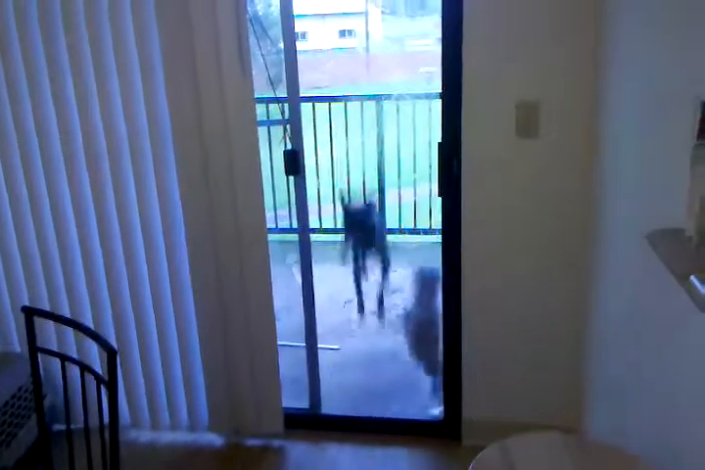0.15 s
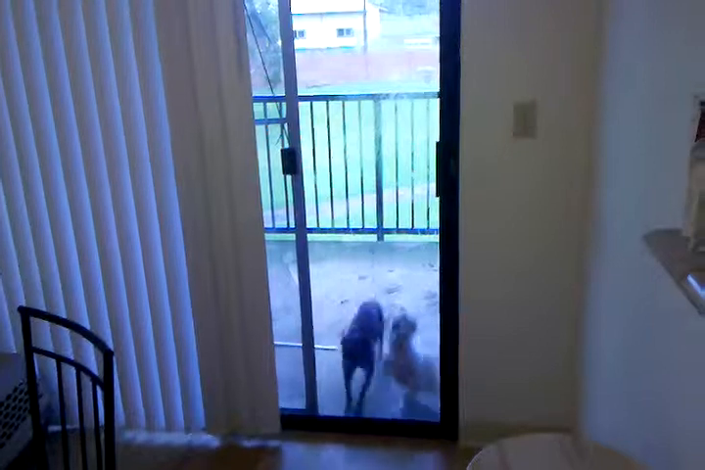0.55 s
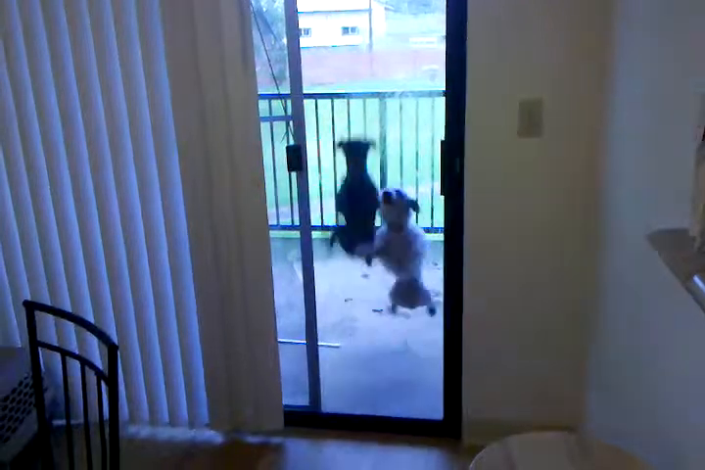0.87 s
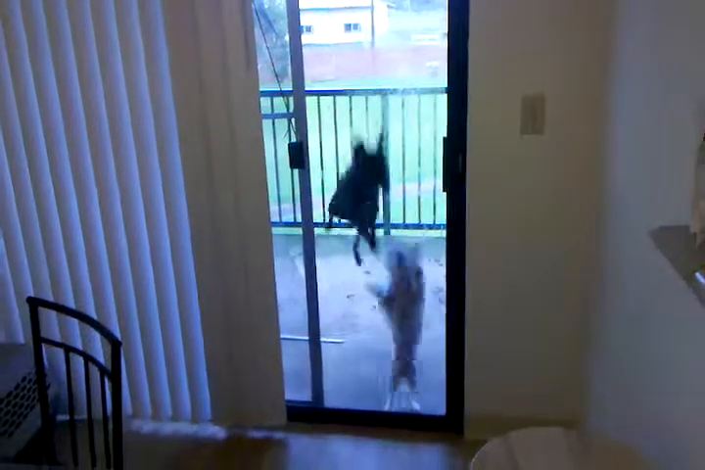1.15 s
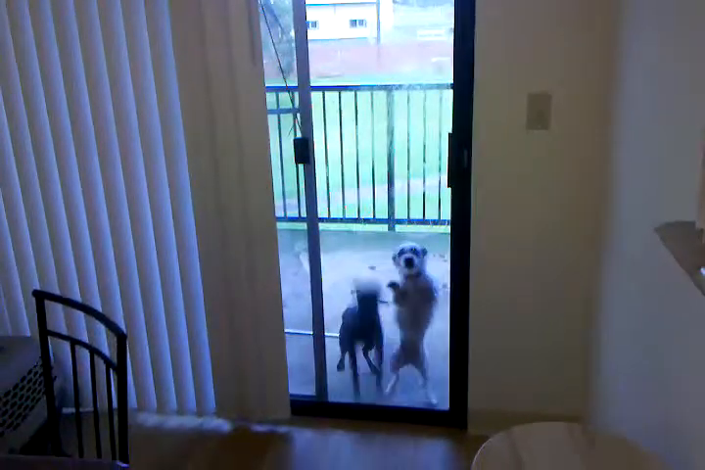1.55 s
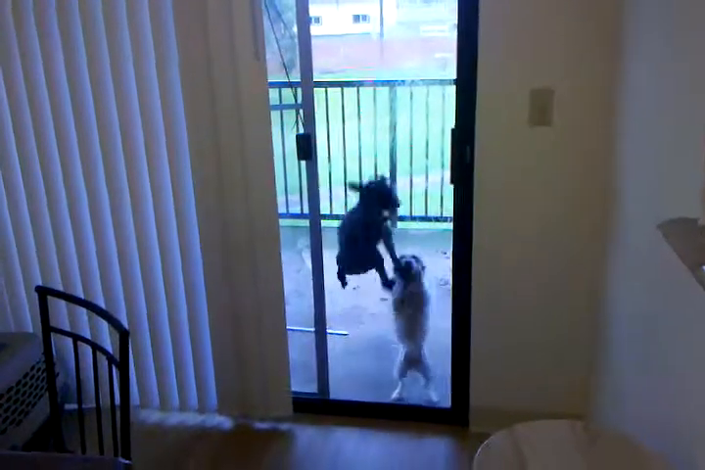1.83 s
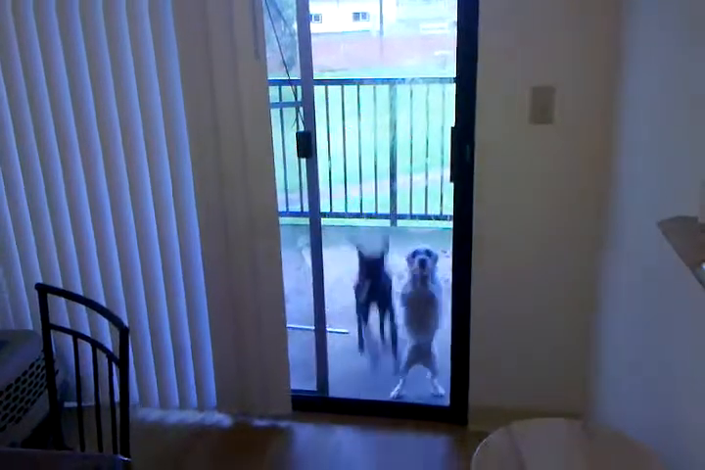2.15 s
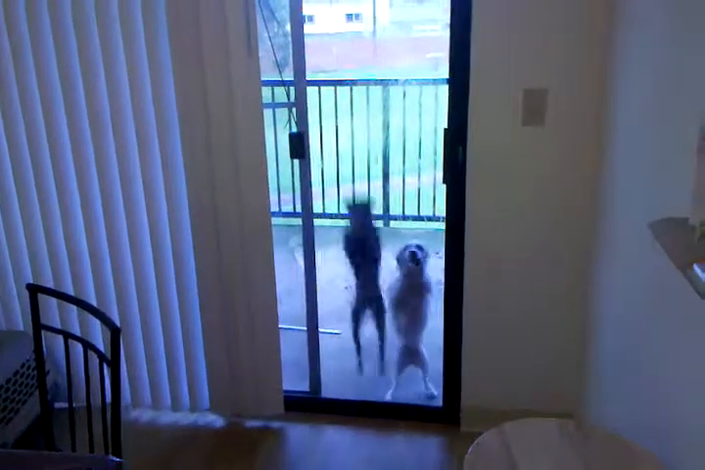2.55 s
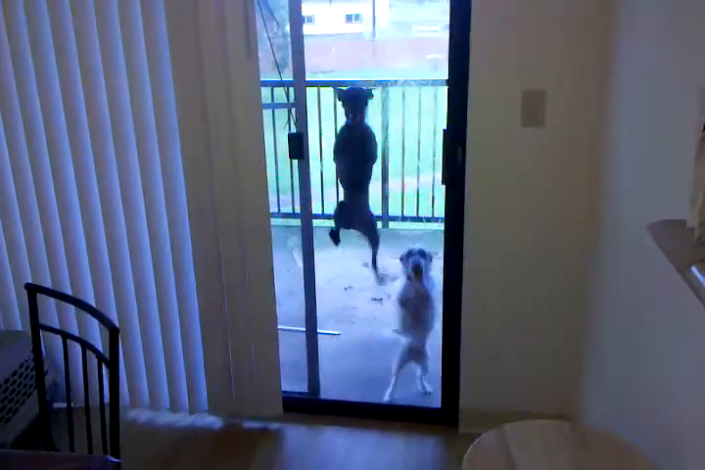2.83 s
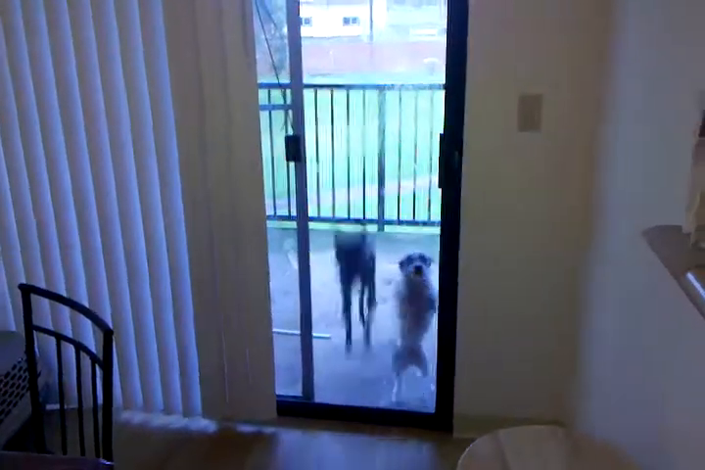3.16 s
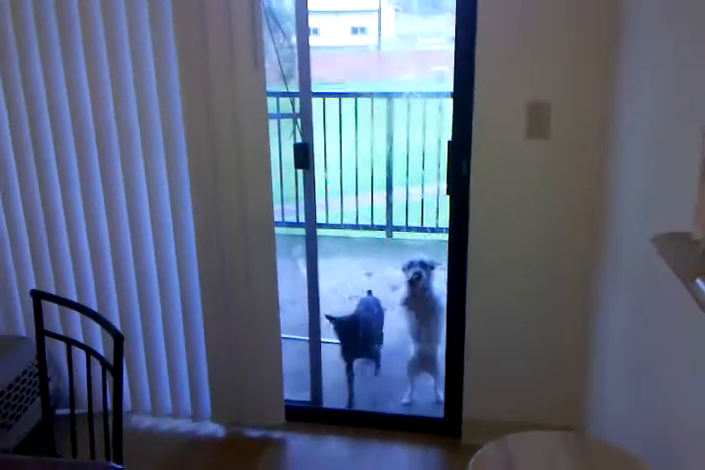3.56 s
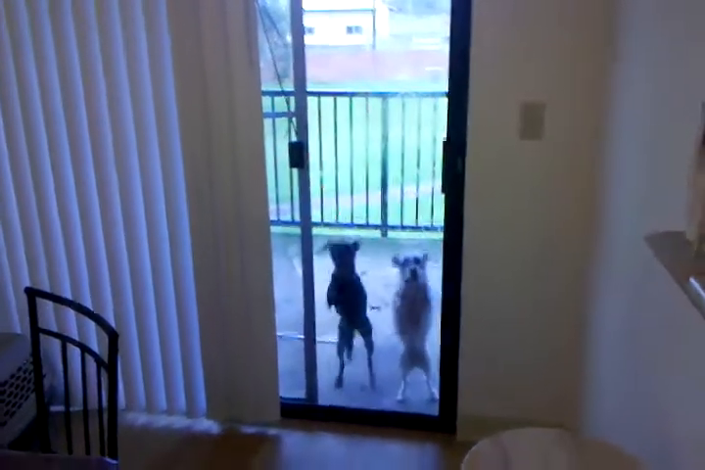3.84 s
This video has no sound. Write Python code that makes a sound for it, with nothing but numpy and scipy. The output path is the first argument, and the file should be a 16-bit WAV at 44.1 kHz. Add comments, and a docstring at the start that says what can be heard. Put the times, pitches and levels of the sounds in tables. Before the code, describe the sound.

Dog claws strike and skitter on a sliding glass door from 0 s, in irregular bright bursts, strongest around 0, 1.1-1.2, 2.0 and 2.9 s. Soft low paw booms and door-track rattles accompany them. Very short, wavering whines appear from 0.25 s, with raspy yelps near 0.4, 2.4 and 3.8 s. Dry double knocks sound close at 3.3 and 3.6 s. Bare reverberant room, faint air and low hum.

```python
"""Two dogs leap at a sliding glass door for four seconds, heard from inside a bare, echoing room. From the
first instant claws chatter on the pane (noisy blows through ringing glass) and paws make it boom; the door soon
clatters in its track. From 0.25 s come whines (wavering gliding tones), from 0.4 s rasping yelps (filtered
noise). Near 3.3 s and 3.6 s two dry double clicks (damped sines with noise ticks) sound right at the
microphone. Room air (shaped noise) and a soft, steady hum (a sine) lie underneath throughout."""
import sys
import numpy as np
from scipy import signal
from scipy.fft import rfft, irfft
from scipy.io import wavfile
from scipy.ndimage import uniform_filter1d

SR = 44100
rng = np.random.default_rng(int(sys.argv[2]) if len(sys.argv) > 2 else 0)


def wav_record(signal):
    """Record a signal, one row per channel, as 16-bit PCM in the file named by sys.argv[1]."""
    frames = np.transpose(np.atleast_2d(signal))
    bounded = np.clip(frames, -1, 1)
    # unit amplitude maps onto the largest positive 16-bit level
    quanta = np.round(bounded * 32767).astype(np.int16)
    wavfile.write(sys.argv[1], SR, quanta)


N = 176400
T = np.arange(N) / SR

# All event levels are those of the direct sound, before room and microphone.
# Claws on the glass: (time [s], level [dB], scrape length [s], emphasised frequency [Hz])
CLAW_SCRAPES = [(0.0, -21, 0.004, 5000), (0.022, -42, 0.023, 4500), (0.117, -33, 0.0055, 5900),
                (.232, -68, 0.0063, 4860), (0.435, -37, 0.025, 4600), (0.601, -44.5, 0.0067, 5900),
                (0.64, -28, 0.0077, 4900), (.852, -48, 0.012, 4400), (1.054, -37.5, .008, 4630),
                (1.06, -26.5, 0.012, 5600), (1.125, -25.5, .012, 4300), (1.15, -33, 0.0089, 4200),
                (1.218, -24, 0.01, 3830), (1.261, -40.5, 0.023, 4440), (1.386, -38.5, 0.024, 4340),
                (1.492, -35, .016, 5060), (1.526, -37.5, 0.021, 5170), (1.648, -44.5, 0.013, 4160),
                (1.708, -42, 0.013, 5200), (1.734, -44, 0.0072, 3940), (1.924, -50, 0.014, 5500),
                (1.962, -23, 0.008, 5800), (2.005, -25.5, 0.006, 4180), (2.041, -29, 0.0058, 6040),
                (2.074, -36.5, .012, 5160), (2.114, -37.5, 0.0075, 5400), (2.175, -31, 0.013, 4300),
                (2.203, -36.5, 0.021, 5000), (2.429, -37, 0.01, 4630), (2.589, -43.5, 0.018, 4930),
                (2.656, -48.5, 0.0088, 5000), (2.802, -36, 0.0047, 5100), (2.871, -36.5, 0.0088, 4600),
                (2.902, -21.5, 0.004, 5250), (2.936, -38, 0.0044, 3940), (2.960, -25, 0.0047, 6400),
                (3.023, -34, 0.0091, 4640), (3.048, -36.5, 0.02, 5550), (3.196, -34.5, 0.015, 3970),
                (3.244, -39.5, 0.02, 4200), (3.294, -36.5, 0.0073, 5400), (3.358, -41.5, 0.0096, 5000),
                (3.421, -39, 0.013, 4770), (3.495, -40.5, 0.0052, 5450), (3.531, -37, 0.016, 5670),
                (3.581, -43, 0.021, 4150), (3.638, -47, 0.025, 5070), (3.708, -41, 0.017, 5300),
                (3.723, -39, 0.016, 5360), (3.837, -32.5, 0.0034, 5230), (3.853, -32.5, 0.008, 5060),
                (3.889, -41.5, 0.018, 5570), (3.915, -41, .04, 4850)]
# Door shaken in its track: (time [s], level [dB], rattle length [s])
DOOR_RATTLES = [(0.085, -49.5, 0.08), (.225, -43.5, 0.0079), (0.438, -53, 0.049), (0.652, -42.5, 0.021),
                (0.696, -53, 0.026), (.756, -39, 0.0084), (1.14, -52.5, 0.073), (1.217, -34.5, 0.013),
                (1.272, -43, 0.026), (1.528, -54.5, 0.049), (1.685, -53, 0.06), (1.76, -47, 0.042),
                (1.792, -56, 0.03), (1.85, -46.5, 0.0095), (1.955, -48, 0.031), (2.069, -59.5, 0.024),
                (2.292, -47.5, 0.032), (2.33, -42.5, 0.02), (2.429, -52, 0.013), (2.87, -43, 0.025),
                (3.023, -37.5, 0.009), (3.39, -42, 0.032), (3.529, -42.5, 0.026), (3.582, -41, 0.0064),
                (3.706, -64, 0.021), (3.835, -45.5, 0.01), (3.895, -39, .015), (3.918, -41, 0.027),
                (3.972, -49, .03)]
# Weight of a dog on the pane: (time [s], level [dB], push length [s], emphasised frequency [Hz])
PANE_BOOMS = [(0.0, -43.5, 0.029, 152), (.08, -43.5, 0.022, 136), (0.449, -50.5, 0.022, 164),
              (0.689, -49, 0.016, 194), (1.138, -49, .065, 116), (1.258, -68, 0.019, 78.5),
              (1.774, -52, 0.039, 200), (2.066, -42, 0.0083, 138), (2.221, -53.5, 0.05, 88),
              (2.36, -52.5, 0.081, 130), (2.46, -57, 0.059, 80), (2.586, -49.5, 0.012, 92),
              (2.724, -53, 0.058, 175), (2.879, -57.5, 0.079, 150), (3.021, -59, 0.033, 125),
              (3.28, -47.5, 0.029, 149), (3.40, -54, 0.032, 111), (3.569, -60.5, 0.038, 176),
              (3.70, -54, 0.12, 116.6), (3.897, -44.5, 0.031, 176.5), (3.972, -54, 0.038, 170)]
# Whines: (time [s], length [s], first pitch [Hz], last pitch [Hz], level [dB],
#          octave overtone relative to the fundamental [dB])
DOG_WHINES = [(0.249, 0.052, 1114, 1073, -57, -42), (.376, 0.041, 1151, 1356, -46.5, -13),
              (0.39, 0.05, 1318, 1792, -48, 4), (1.332, 0.039, 1137, 1186, -45, -24),
              (1.39, 0.028, 1055, 1118, -50, -47), (1.565, 0.11, 772, 841, -53.5, -36),
              (1.783, 0.062, 1956, 1990, -48, -33), (1.793, 0.058, 2070, 2420, -49, -39.5),
              (1.865, 0.042, 2443, 2437, -53, -33.5), (2.299, 0.043, 1800, 1797, -42.5, -9),
              (2.39, 0.074, 1244, 1064, -52, -11.5), (2.772, 0.039, 1846, 1983, -44.5, -36),
              (2.785, 0.015, 1340, 1195, -49.5, -27), (2.795, .04, 2196, 2345, -51.5, -28),
              (2.86, 0.06, 1268, 1158, -46.5, -5), (3.276, 0.023, 1325, 1323, -48, -43),
              (3.334, 0.015, 1353, 1329, -45.5, -32), (3.755, 0.044, 1550, 1584, -48, -27),
              (3.829, 0.042, 1431, 1579, -44, -23), (3.83, 0.031, 1027, 1043, -47, -35)]
# Hoarse yelps: (time [s], length [s], level [dB], throat resonance [Hz])
DOG_YELPS = [(.425, 0.04, -44, 1060), (.435, 0.041, -47.5, 1650), (2.41, 0.08, -55, 2290),
             (3.826, 0.031, -44.5, 1330)]
# Clicks right at the microphone: (time [s], peak of the ring [dB], pitch [Hz], tick gain relative to it [dB])
CLOSE_CLICKS = [(3.3183, -35.5, 1200, 10.5), (3.3389, -26.5, 690, -3), (3.586, -35, 520, -12),
                (3.6059, -24.5, 520, -4.5)]

# Spectra of the struck bodies and of the room air: (frequency [Hz], relative level [dB])
CLAW_SPECTRUM = [(150, -17.5), (500, -25), (1200, -18), (1950, -19.5), (2600, -11), (3200, -6.5), (4000, 1),
                 (5200, -1), (6700, -3.5), (7500, -0.5)]
DOOR_SPECTRUM = [(100, -35.5), (250, -1.5), (350, 5), (490, 3), (620, 3), (860, 5.5), (1100, 3.5),
                 (1450, 4.5), (1800, -6), (3000, -8.5), (7000, -43)]
PANE_SPECTRUM = [(35, -41.5), (58, -17.5), (78, -3.5), (98, -7), (120, -7), (145, -6.5), (175, -1),
                 (230, -9), (330, -4.5), (600, -16.5), (2000, -43.5)]
AIR_SPECTRUM = [(30, -27), (60, -22.5), (80, -10.5), (100, -8), (150, -5), (250, -5), (400, -8.5),
                (500, -8), (1000, -11), (2000, -15), (3000, -20), (4500, -11), (7000, -17.5)]
# Ringing modes of the glass and of its frame: (frequency [Hz], relative level [dB], 60 dB decay time [s])
GLASS_RING = [(3056, 8.5, 0.098), (3880, -5.5, 0.043), (4080, -40, 0.056), (4870, -8, .1),
              (5080, 24.5, 0.052), (6300, 18.5, 0.041), (7150, 30.5, 0.039)]
FRAME_RING = [(500, 7.5, 0.23), (894, -0.5, 0.096), (1166, -1, 0.062), (1370, -12, 0.047), (1450, -2, 0.08)]

CHATTER_PER_S, RATTLE_PER_S, PUSH_PER_S = 2000, 700, 1000  # mean rate of tiny blows
HOARSE_DB, HOARSE_WIDTH_HZ = -10, 280  # breath noise in a whine, relative to its tone
CLICK_RISE_S, CLICK_DECAY_S = 0.00091, 0.0022
ROOM_T60_S, ROOM_TREBLE_T60_S, ROOM_GAP_S = 0.7, 0.54, 0.0068
AIR_DB, HUM_DB, HUM_HZ = -53.5, -64, 118.6  # RMS levels before the microphone
TOP_HZ = 7050  # upper limit of the microphone


def amp(db):
    """Turn decibels into an amplitude factor."""
    return 10 ** (np.asarray(db) / 20)


def unit(x):
    """Scale to an energy of 1."""
    return x / np.sqrt(np.sum(x ** 2) + 1e-18)


def add(out, at, x):
    """Mix x in from a given time."""
    i = int(np.clip(at * SR, 0, N - 1))
    out[i:i + len(x)] += x[:N - i]


def through(x, response):
    """Convolve with an impulse response."""
    return signal.fftconvolve(x, response)[:N]


def colour(points, size=4096):
    """Minimum-phase impulse response with a given spectrum and unit energy, made by folding the cepstrum."""
    hz, db = np.array(points).T
    f = np.maximum(np.fft.rfftfreq(size, 1 / SR), 1)
    level_db = np.interp(np.log(f), np.log(hz), db)
    rolloff = np.log(1 + (f / hz[-1] / 1.1) ** 16)  # steep fall above the last point
    cepstrum = irfft(np.log(amp(level_db)) - rolloff)
    cepstrum[1:size // 2] *= 2
    cepstrum[size // 2 + 1:] = 0
    return unit(irfft(np.exp(rfft(cepstrum)))[:size // 2])


def band(x, hz, width_hz):
    """One resonance, gain 1 at its centre."""
    return signal.lfilter(*signal.iirpeak(hz, hz / width_hz, fs=SR), x)


def body(points, modes, ring_db):
    """A struck object: a broad crack and a few ringing modes."""
    crack = colour(points, size=16384)
    t = T[:len(crack)]
    ring = np.zeros(len(t))
    for hz, db, t60 in modes:
        ring += amp(db - 60 * t / t60) * np.cos(2 * np.pi * hz * t)
    return unit(crack + amp(ring_db) * unit(ring))


def contact(length, rate, rise_s, release_s, spread_db, size=8192):
    """Stick and slip: irregular tiny blows that set in, hold and die away."""
    t = T[:size]
    chance, strength = rng.random(size), rng.standard_normal(size)
    sign = rng.choice([-1, 1], size)
    onset = 1 - np.exp(-t / rise_s)
    release = np.exp(-np.maximum(t - length, 0) / release_s)
    return (chance < rate / SR) * sign * amp(spread_db * strength) * onset * release


def held(x, db, length):
    """Give a burst the energy of a steady sound at this RMS level lasting for length."""
    return unit(x) * amp(db) * np.sqrt(length * SR)


def room(x, wet_db):
    """Direct sound and the diffuse tail of hard walls, a little shorter in the treble."""
    t = T[:SR]

    def tail_part(kind, t60):
        split = signal.butter(2, 2500, kind, fs=SR, output="sos")
        return signal.sosfilt(split, rng.standard_normal(SR)) * np.exp(-np.log(1000) * t / t60)

    tail = tail_part("low", ROOM_T60_S) + tail_part("high", ROOM_TREBLE_T60_S)
    fade_in = np.clip(t / ROOM_GAP_S - 1, 0, 1)  # silent for one gap, full after two
    return x + amp(wet_db) * through(x, unit(tail * fade_in))


def claws():
    """Each claw skids over the pane in a short, bright chatter; every spot of the glass rings differently."""
    out, glass = np.zeros(N), body(CLAW_SPECTRUM, GLASS_RING, ring_db=-27.5)
    for at, db, length, hz in CLAW_SCRAPES:
        scrape = contact(length, CHATTER_PER_S, rise_s=0.0014, release_s=0.008, spread_db=2)
        scrape = scrape + 0.62 * band(scrape, hz, width_hz=1700)
        add(out, at, held(signal.fftconvolve(scrape, glass), db, length))
    return room(out, wet_db=-1.5)


def rattles():
    """The door clatters in its track: sparser, uneven blows set door and frame ringing."""
    out, door = np.zeros(N), body(DOOR_SPECTRUM, FRAME_RING, ring_db=-10.5)
    for at, db, length in DOOR_RATTLES:
        clatter = contact(length, RATTLE_PER_S, rise_s=0.0023, release_s=0.017, spread_db=4)
        add(out, at, held(signal.fftconvolve(clatter, door), db, length))
    return room(out, wet_db=-1.5)


def booms():
    """The big pane flexes under soft paws; where they land sets the pitch of the boom."""
    out, pane = np.zeros(N), colour(PANE_SPECTRUM)
    for at, db, length, hz in PANE_BOOMS:
        push = contact(length, PUSH_PER_S, rise_s=0.002, release_s=0.022, spread_db=6)
        push = push + 3 * band(push, hz, width_hz=35)
        add(out, at, held(signal.fftconvolve(push, pane), db, length))
    return room(out, wet_db=-4.5)


def swell(length, rise_s, fall_s):
    """Time and loudness of one call; the fall is centred on its nominal end."""
    t = T[:SR // 4]
    return t, np.clip(t / rise_s, 0, 1) * np.clip((length - t) / fall_s + 0.5, 0, 1)


def waver(size=11025, count=220):
    """Random wobble with a spread of 1: noise averaged twice over count samples."""
    w = uniform_filter1d(uniform_filter1d(rng.standard_normal(size), count), count)
    return w / w.std()


def throat_noise(size, hz, first_width_hz, second_width_hz):
    """Breath noise narrowed by two resonances at the same pitch."""
    return band(band(rng.standard_normal(size), hz, first_width_hz), hz, second_width_hz)


def whines():
    """Thin, slightly hoarse tones slide to their last pitch with a shaky voice."""
    out = np.zeros(N)
    for at, length, first_hz, last_hz, db, octave_db in DOG_WHINES:
        t, loud = swell(length, rise_s=0.013, fall_s=0.016)
        hz = last_hz + (first_hz - last_hz) * (1 - np.minimum(t / length, 1)) ** 2
        jitter = 0.011 * waver() + 0.016 * waver(count=45)  # slow and fast pitch wobble
        shimmer = amp(2 * waver(count=330))  # loudness wobble
        phase = 2 * np.pi * np.cumsum(hz * (1 + jitter)) / SR
        tone = np.sin(phase) + amp(octave_db) * np.sin(2 * phase)
        rasp = throat_noise(len(t), last_hz, HOARSE_WIDTH_HZ, HOARSE_WIDTH_HZ)
        voice = unit(tone) + amp(HOARSE_DB) * unit(rasp)
        add(out, at, held(loud * shimmer * voice, db, length))
    return out


def yelps():
    """Rasping bursts of breath noise, coloured by a throat resonance."""
    out = np.zeros(N)
    for at, length, db, hz in DOG_YELPS:
        t, loud = swell(length, rise_s=0.003, fall_s=0.028)
        add(out, at, held(loud * throat_noise(len(t), hz, 750, 700), db, length))
    return out


def dogs():
    """Both kinds of call ring in the same room, the tail slightly stronger than the direct voice."""
    return room(whines() + yelps(), wet_db=1)


def clicks():
    """Dry, short clicks a few cycles long, each with a noise tick, which dominates the first click."""
    out, t = np.zeros(N), T[:SR // 20]
    decay = np.exp(-t / CLICK_DECAY_S)
    for at, db, hz, tick_db in CLOSE_CLICKS:
        ring = np.sin(2 * np.pi * hz * t) * (1 - np.exp(-t / CLICK_RISE_S)) * decay
        tick = amp(tick_db) * band(rng.standard_normal(len(t)), 1300, width_hz=2400) * decay
        add(out, at, amp(db) * (ring / np.abs(ring).max() + tick))
    return room(out, wet_db=-18.5)


def room_air():
    """Steady noise with the spectrum of the room air."""
    air = unit(through(rng.standard_normal(N), colour(AIR_SPECTRUM))) * np.sqrt(N)  # RMS of 1
    return amp(AIR_DB) * air


def hum():
    """A soft, steady hum: one low sine."""
    return amp(HUM_DB) * np.sqrt(2) * np.sin(2 * np.pi * HUM_HZ * T)


def scene():
    """Mix all sources to one channel."""
    return (claws() + rattles() + booms() + dogs() + clicks() + room_air() + hum())[None]


def record(dry):
    """A small microphone loses the deep bass and the high treble."""
    thin = signal.sosfilt(signal.butter(4, 64, "high", fs=SR, output="sos"), dry)
    return signal.sosfilt(signal.cheby1(12, 0.2, TOP_HZ, fs=SR, output="sos"), thin)


dry = scene()
out = record(dry)
wav_record(out)
```